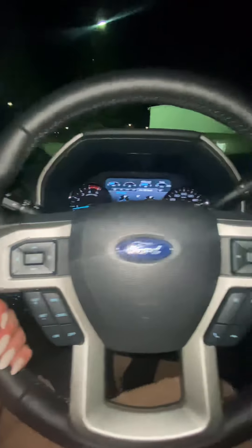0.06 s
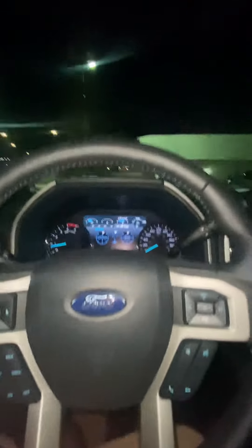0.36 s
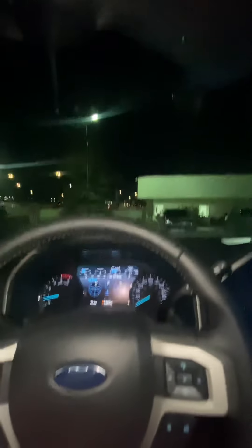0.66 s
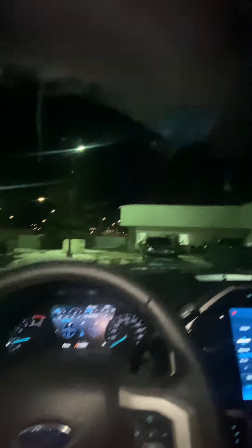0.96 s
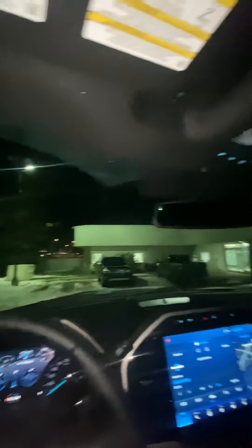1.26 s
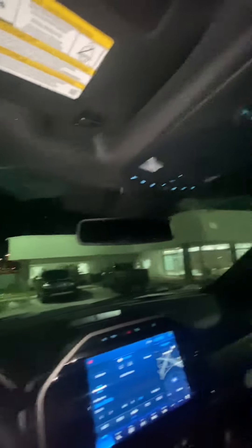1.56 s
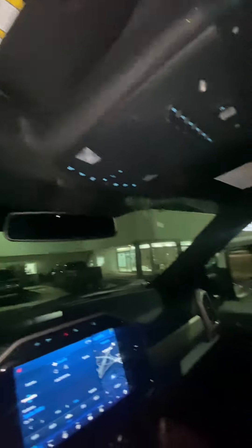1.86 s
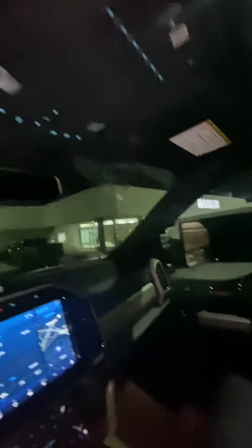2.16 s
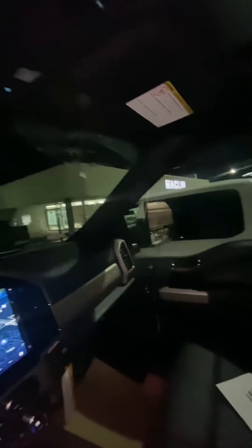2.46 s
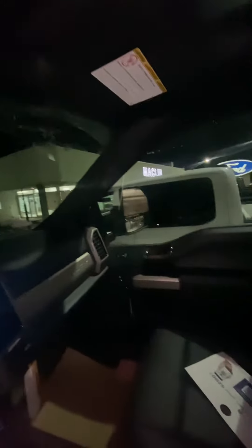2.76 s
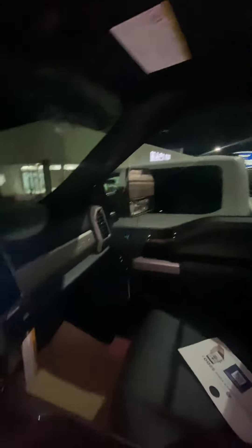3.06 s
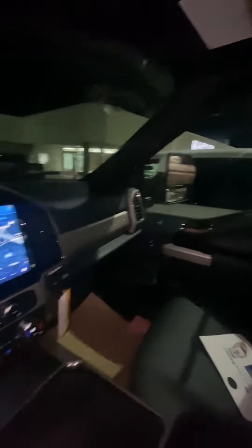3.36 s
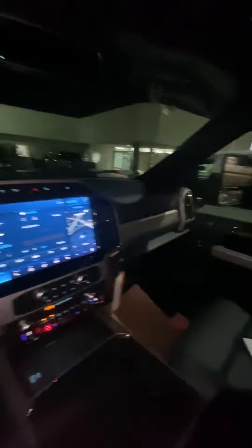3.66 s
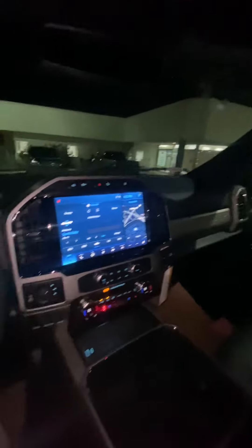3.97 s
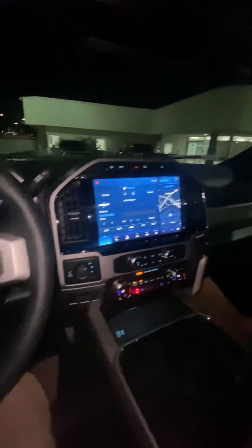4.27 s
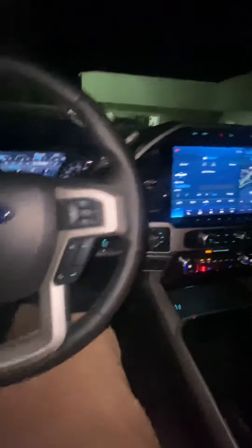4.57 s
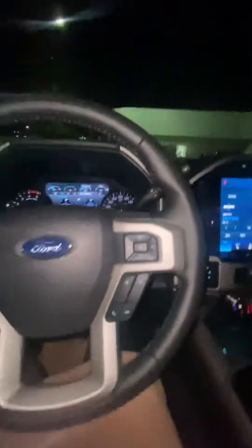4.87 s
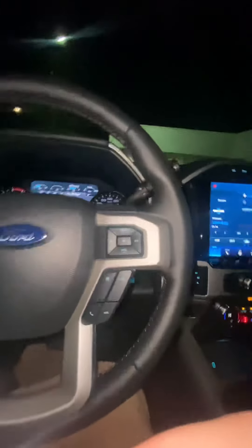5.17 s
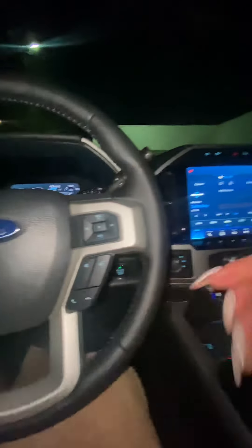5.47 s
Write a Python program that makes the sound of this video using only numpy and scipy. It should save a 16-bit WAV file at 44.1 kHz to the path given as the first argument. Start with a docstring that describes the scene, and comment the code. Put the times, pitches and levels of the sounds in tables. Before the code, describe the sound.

A diesel pickup idles with a low rumble inside the cab, vents blowing softly, until fingers tick and knock on the microphone.

```python
"""A diesel pickup idles, heard from the driver's seat with the cab shut.
Its firings give a low note, and uneven combustion shakes the cab into a lumpy rumble.
Dashboard vents blow, changing colour as the hand-held microphone turns toward the passenger
side and back. Near the end a sleeve swishes past, and fingers tick, slide and knock on the
microphone's case, which rings briefly."""
import sys
import numpy as np
from scipy import signal
from scipy.fft import rfft, irfft, next_fast_len
from scipy.io import wavfile
from scipy.ndimage import uniform_filter1d

SR = 44100
rng = np.random.default_rng(int(sys.argv[2]) if len(sys.argv) > 2 else 0)


def transcribe(signal):
    """Save signal, clipped to [-1, 1], as a 16-bit WAV file at the path in sys.argv[1]."""
    frames = np.atleast_2d(signal).T
    limited = np.clip(frames, -1, 1)
    pcm = np.round(limited * 32767).astype(np.int16)
    wavfile.write(sys.argv[1], SR, pcm)


N = 247911
TIME = np.arange(N) / SR
SIZE = next_fast_len(N, True)
BINS = np.fft.rfftfreq(SIZE, 1 / SR)


# firing rate of the eight cylinders: t/s, f/Hz
FIRING_RATE = [(0, 43.76), (1, 43.75), (1.6, 43.6), (5.62, 43.6)]
# the cab's response to the shaking engine: f/Hz, level/dB
CAB_EQ = [(12, -40.5), (26, -27.5), (34, -16.5), (48, -10), (58, 2), (68, 2), (80, 2), (100, -3),
          (113, 0.5), (123, -0.5), (131, 6), (146, 0.5), (185, -12.5), (240, -19.5), (400, -31.5)]
# fader ride on the body's deep shudder: t/s, level/dB
SHUDDER_RIDE = [(0, -38), (.24, -27), (.33, -38), (.5, -28.5), (.7, -37), (.85, -29.5), (.98, -37.5),
                (1.18, -29), (1.31, -36), (1.43, -28), (1.58, -34.5), (2, -33.5), (2.13, -37), (2.67, -32),
                (3, -37), (3.35, -34), (3.55, -39), (3.66, -31), (3.9, -40), (4.02, -32.5), (4.55, -36),
                (4.67, -28.5), (5.03, -38.5), (5.17, -28), (5.62, -37)]
# fader ride on the hum around the third harmonic: t/s, level/dB
HUM_RIDE = [(0, -53), (.12, -28.5), (.3, -32), (.4, -26.5), (.52, -37.5), (.65, -26), (.87, -29),
            (1.0, -38), (1.16, -38), (1.23, -31.5), (1.33, -39.5), (1.7, -37), (2, -41.5), (2.13, -32),
            (2.5, -35), (3, -37.5), (3.3, -35.5), (3.56, -48), (3.67, -29), (3.87, -33), (4.13, -39.5),
            (4.26, -32), (4.5, -35), (5.04, -30), (5.14, -41.5), (5.33, -36.5), (5.47, -34), (5.62, -36.5)]

def engine(shudder_top_hz=105, hum_band_hz=(114.2, 154.3), surge_db=1.4):
    """Firings give a clean low note; uneven combustion makes the cab shudder, hum and boom."""
    firings = np.cumsum(curve(FIRING_RATE)) / SR
    note = gain_of(2) * harmonic(firings, 1) + gain_of(-13) * harmonic(firings, 2)
    note *= turned(-34.5, -42)  # loudest by the wheel
    fan = cooling_fan()
    cab = gain_of(read(CAB_EQ, BINS))
    low, high = hum_band_hz
    shudder = steady_noise(cab * band(15, shudder_top_hz), span=4400) * gain_of(curve(SHUDDER_RIDE))
    clean_hum = gain_of(-3.5) * harmonic(firings, 3, waver_db=0.3, wander_cycles=0.026)
    rough_hum = gain_of(-3) * steady_noise(cab * band(low, high), span=4400)
    hum = (clean_hum + rough_hum) * gain_of(curve(HUM_RIDE))
    boom = steady_noise(cab * (band(shudder_top_hz, low) + band(high, 410)), span=4400)
    boom *= turned(-34.5, -36.5) * gain_of(surge_db * drift(5))
    return note + fan + shudder + hum + boom


def harmonic(firings, order, waver_db=0.9, wander_cycles=0.011):
    """One multiple of the firing rate; its wobble in level and timing scales with its order."""
    waver = gain_of(waver_db * order * drift(3.9))
    wander = wander_cycles * order * drift(4.54)
    return np.sqrt(2) * waver * np.cos(2 * np.pi * order * (firings + wander))


def cooling_fan(hz=59.5, db=-43.5):
    """The fan hums faintly at a pitch of its own, apart from the firing rate."""
    return np.sqrt(2) * gain_of(db) * np.sin(2 * np.pi * (hz * TIME + 0.24 * drift(0.88)))


# panel resonances: f/Hz, width/Hz, relative level/dB
PANEL_MODES = [(215.4, 38, -12), (333, 86, -11), (863, 115, -22.5)]

def panels():
    """The engine murmurs through the bulkhead's panels, most clearly in the driver's seat."""
    return resonances(PANEL_MODES) * turned(-32, -45)


# rush of the vents: f/Hz, level/dB
VENT_EQ = [(230, 3), (275, -3), (335, -7), (400, -2), (500, -3.5), (730, -8.5), (880, -13.5), (1020, -15.5),
           (1260, -18.5), (1520, -22.5), (1850, -24.5), (2450, -21.5), (3100, -27), (3700, -28.5),
           (4400, -32), (5100, -33), (5900, -36.5)]
# its faint top end: f/Hz, level/dB
VENT_TOP_EQ = [(6500, -40), (7500, -44), (8400, -44.5), (9400, -44.5), (10500, -50), (12300, -54),
               (12900, -72)]
# vents the microphone swings past: nearest t/s, half-length/s, stream gain/dB, slat gain/dB
VENT_PASSES = [(1.237, 1, 1.5, -4), (2.895, 0.66, 1, 3.5), (4.247, 0.12, -0.5, 7)]

def vents(slat_hz=5410, slat_width_hz=1350, flutter_db=0.6, eddy_db=0.52):
    """Air streams from the dashboard; its roar and rush grow as the microphone turns into it."""
    colour = gain_of(read(VENT_EQ + VENT_TOP_EQ, BINS))
    slat_colour = 1 / np.sqrt(1 + (2 * (BINS - slat_hz) / slat_width_hz) ** 6)
    stream = gain_of(sum(db * nearness(s, half) for s, half, db, _ in VENT_PASSES))
    slats = gain_of(sum(db * nearness(s, half) for s, half, _, db in VENT_PASSES))
    layers = [(colour * band(215, 450), turned(-50, -44.5)),  # roar
              (colour * band(450, 950), turned(-55.5, -46.5) * stream),  # rush
              (colour * band(950, 12600), turned(-54.5, -53) * stream),  # hiss
              (slat_colour, turned(-66.5, -69) * slats)]  # hollow hiss of the slats
    # the turn crossfades between two patterns of reflections
    heading = np.pi / 2 * curve(MIC_TURN)
    ahead, aside = reflections(), reflections()
    flutter = flutter_db * drift(28)  # shared by the whole stream
    out = 0
    for eq, level in layers:
        air = np.cos(heading) * steady_noise(eq * ahead) + np.sin(heading) * steady_noise(eq * aside)
        eddies = eddy_db * drift(11)
        out += air * level * gain_of(flutter + eddies)
    return out


def reflections(strength=0.07, count=8):
    """Glass and trim throw sound back within milliseconds, combing its spectrum."""
    delays_s = rng.uniform(0.002, 0.016, (count, 1))
    return abs(1 + strength * np.exp(-2j * np.pi * BINS * delays_s).sum(0))


def windscreen_notch(air, at_s=3.7, half_s=0.3, hz=4100, width_hz=960, depth=0.3):
    """Glancing off the windscreen, the hiss briefly loses part of one band."""
    lost = filtered(air, np.exp(-(2 * (BINS - hz) / width_hz) ** 2))
    return air - depth * np.exp(-((TIME - at_s) / half_s) ** 2) * lost


# fingertip hits: t/s, level/dB, treble tilt/(dB per octave)
KNOCK_HITS = [(4.838, -25.5, -7), (5.082, -18, -4), (5.144, -43, 0), (5.249, -30, -1), (5.3989, -13.5, 0),
              (5.4089, -3.5, -0.5)]
# the case's ring: f/Hz, relative level/dB, t60/s, right port's lead/rad
CASE_MODES = [(219, -24.5, 0.072, 1.2), (333, -18.5, 0.052, 1.3), (449, -14, 0.028, 1.3),
              (509, -1.5, 0.027, 3), (550, -17.5, .09, 2.27), (820, -19, 0.022, 3.5), (1047, -30, 0.1, 1.7),
              (1240, -17, 0.022, 3.07), (1420, -21, 0.03, 3.3), (1730, -29, 0.026, 2.5),
              (1946, -28.5, 0.031, 1.25)]

def knocks(rise_s=0.0019, tilt_above_hz=520):
    """A soft fingertip flexes the case, whose strongest modes push the ports nearly in opposition."""
    out = np.zeros((2, N))
    t = np.arange(-800, 3200) / SR
    for s, db, tilt in KNOCK_HITS:
        slot = out[:, round((s + t[0]) * SR):][:, :len(t)]
        for hz, mode_db, t60, lead in CASE_MODES:
            envelope = np.exp(np.minimum(t / rise_s, -np.log(1000) * t / t60))
            ring = envelope * np.sin(2 * np.pi * hz * t + np.array([[0], [lead]]))
            tilt_db = tilt * max(np.log2(hz / tilt_above_hz), 0)
            slot += gain_of(db + mode_db + tilt_db) * ring[:, :slot.shape[1]]
    return out


# nail hits: t/s, level/dB, tilt/(dB per octave), ring decay/s,
# low ring f/Hz, level/dB, high ring f/Hz, level/dB
NAIL_HITS = [(4.818, -24.5, -0.7, .0018, 1650, -31, 2400, -31),
             (5.0776, -27, 3, .0012, 2500, -32, 8300, -38),
             (5.0786, -31, -2.5, .002, 1360, -25.5, 3200, -40),
             (5.1385, -37, 0, .002, 1750, -38, 8350, -46), (5.232, -37, 1, .001, 3300, -47, 5600, -50),
             (5.2455, -34, -1, .002, 1100, -42, 1910, -45), (5.372, -42, -5, .003, 1150, -36, 2500, -48),
             (5.396, -29, -4, .0018, 1510, -32, 2600, -33),
             (5.4058, -29, -5.5, .0025, 1290, -31, 2510, -28.5),
             (5.4076, -18, -3.8, .0024, 1950, -28, 3550, -35)]
# snap of a nail on the case: f/Hz, level/dB
NAIL_EQ = [(500, 11), (1500, 1), (1950, -3), (2400, -8), (2900, -8), (3500, 1), (5000, -0.5), (6300, 2),
           (7200, -15.5), (9000, -17), (12000, -25), (15000, -47)]

def nail_ticks(grit_rise_s=0.0004, grit_decay_s=0.0008, snap=0.4, ring_rise_s=0.0006, lead_rad=2.5):
    """A nail touches the case: a millisecond of grit and a brief two-note ring of the spot it hits."""
    out = np.zeros((2, N))
    for s, db, tilt, decay_s, low_hz, low_db, high_hz, high_db in NAIL_HITS:
        t = TIME - s
        colour = gain_of(read(NAIL_EQ, BINS) + tilt * np.log2(BINS / 2500 + 0.085))
        grit = rng.standard_normal((2, N)) + rng.standard_normal(N)
        grit *= transient(t, grit_rise_s, grit_decay_s)
        grit /= np.linalg.norm(grit, axis=1, keepdims=True)
        grit[:, round(s * SR)] += snap
        out += gain_of(db) * filtered(grit, colour / colour.mean())
        for hz, ring_db in (low_hz, low_db), (high_hz, high_db):
            ring = np.sin(2 * np.pi * hz * t + np.array([[0], [lead_rad]]))
            out += gain_of(ring_db) * ring * transient(t, ring_rise_s, decay_s)
    return out


# finger strokes: peak t/s, level/dB, attack/s, release/s
SLIDE_STROKES = [(5.14, -33, 0.16, 0.25), (5.385, -38, 0.077, 0.06)]
# scrape of the finger: f/Hz, level/dB
SLIDE_EQ = [(90, 2), (200, 14.5), (420, 10.5), (660, 12), (900, 6.5), (1600, -4), (2300, -6), (3100, -7.5),
            (3700, -11.5), (5000, -13.5), (7200, -20.5), (8500, -30), (10500, -35), (13000, -44)]
# stereo image of the scrape: f/Hz, left-right likeness (-1 or below = opposed)
SLIDE_IMAGE = [(200, -0.48), (900, -1.19), (2000, -0.46), (5000, -0.24)]

def finger_slide():
    """A finger scrapes the case, moving the ports in opposition at low pitch."""
    return friction(SLIDE_EQ, read(SLIDE_IMAGE, BINS), grain_db=0, grit=0.34) * strokes(SLIDE_STROKES)


# squeaks in the slide: peak t/s, level/dB, attack/s, release/s, f/Hz, glide/(Hz per s), width/Hz
SKIN_SQUEAKS = [(5.125, -60, 0.075, 0.06, 8600, 0, 1500), (5.162, -60, .025, .03, 9000, -6000, 1700),
                (5.141, -50, 0.06, 0.045, 1850, -9000, 800), (5.133, -55.5, .06, .06, 3850, -4000, 900)]

def squeaks(spurt_db=3):
    """Sliding skin sticks and slips in short spurts at a few fuzzy pitches, most of them falling."""
    out = 0
    for s, db, attack, release, hz, glide, width in SKIN_SQUEAKS:
        pitch = hz + glide * np.clip(TIME - s, -attack, release)
        out += noise_band(pitch, width, likeness=-0.1) * strokes([(s, db, attack, release)])
    return out * unit_rms(gain_of(spurt_db * drift(180)))


# sleeve stroke: peak t/s, level/dB, attack/s, release/s
SLEEVE_STROKE = [(4.37, -60.5, 0.5, 0.25)]
# hiss of the cloth: f/Hz, level/dB
SLEEVE_EQ = [(3000, -28), (5000, 3), (7000, -4.5), (9800, -5), (12000, -6), (13000, -16), (15500, -24)]

def sleeve_swish():
    """A sleeve brushes past with a soft, bright hiss."""
    return friction(SLEEVE_EQ, likeness=0.28, grain_db=-2, grit=0.1) * strokes(SLEEVE_STROKE)


def friction(eq, likeness, grain_db, grit, pressure_db=2, catches_per_s=420):
    """Rubbing hiss that catches and slips in millisecond grains, under an uneven pressure."""
    hiss = port_noise(np.ones(len(BINS)), likeness)
    catches = rng.random(N) < catches_per_s / SR
    strength = gain_of(0.5 * np.minimum(rng.exponential(1, N), 3))
    crackle = unit_rms(signal.lfilter([1], [1, -np.exp(-1000 / SR)], catches * strength))
    grains = hiss * (1 - grit + grit * crackle)
    scrape = unit_rms(filtered(grains, gain_of(read(eq, BINS))))
    return scrape * unit_rms(gain_of(grain_db * drift(250) + pressure_db * drift(31)))


# the hollow between dashboard and windscreen: f/Hz, width/Hz, level/dB
HOLLOW_MODES = [(729, 133, -51.5), (1290, 76, -59)]

def windscreen_hollow():
    """Air rings in the hollow under the windscreen, heard as the microphone sweeps past it."""
    return resonances(HOLLOW_MODES) * nearness(at_s=1.35, half_s=0.68)


# moving peak in the vents' hiss: t/s, f/Hz, level/dB
HISS_PEAK = [(0, 3710, -79), (.8, 3400, -67), (1.3, 3100, -67.5), (1.9, 2900, -79), (2.4, 3900, -70),
             (2.9, 4490, -68), (3.3, 5200, -68), (3.9, 5500, -79), (4.7, 5500, -78)]

def hiss_sweep():
    """A broad peak in the hiss dips in pitch, then climbs, as the microphone crosses the dashboard."""
    s, hz, db = np.transpose(HISS_PEAK)
    hiss = noise_band(np.interp(TIME, s, hz), width_hz=1100, likeness=0.98)
    return hiss * gain_of(np.interp(TIME, s, db))


# swell of the whistle: peak t/s, level/dB, attack/s, release/s
WHISTLE_SWELL = [(3.03, -70.5, 0.38, 0.27)]

def slat_whistle(hz=6060):
    """One slat whistles faintly while the microphone points at the passenger side."""
    return noise_band(np.full(N, hz), width_hz=120, likeness=0.65) * strokes(WHISTLE_SWELL)


# where the microphone points: t/s, heading (0 = wheel, 1 = passenger side)
MIC_TURN = [(0, 0), (.7, 0.35), (1.4, 0.6), (2.2, 0.88), (2.9, 1), (3.5, 0.79), (4.2, 0.75), (4.7, 0.22),
            (5.62, 0.31)]

def turned(wheel_db, passenger_db):
    """Gain that rides between two levels as the microphone turns."""
    return gain_of(wheel_db + (passenger_db - wheel_db) * curve(MIC_TURN))


# stereo image of the steady noise, with left and right opposed around 7-8 kHz:
# f/Hz, likeness 0-1, left lead/rad, left gain/dB
NOISE_IMAGE = [(60.3, 0.98, 0, 1), (129, 1, 0.12, -2), (280, 0.94, 0.36, -3), (530, 0.94, 1.12, -2),
               (784, 0.36, 0.92, 0), (1230, 0.14, 0.76, 4), (2010, 0.59, 0.74, 0), (2360, 1, 1.91, -0.5),
               (4200, 0.75, 1.56, 1), (5500, 0.8, 1, -1), (6550, 0.4, 2, -1.5), (6920, 1, 3.5, 3.5),
               (7830, 1, 3, 2), (8600, 0.8, 1.5, 3), (9500, 1, 0, -3), (10900, 0.6, 0.5, 4)]

def steady_noise(eq, span=9000):
    """Coloured stereo noise, its level held even over span samples."""
    likeness, lead_rad, left_db = (read(NOISE_IMAGE, BINS, column) for column in (1, 2, 3))
    pair = port_noise(eq, likeness, lead_rad, left_db)
    power = uniform_filter1d(uniform_filter1d(pair.mean(0) ** 2, span), span)
    return pair / np.sqrt(power + 1e-12)


def port_noise(eq, likeness, lead_rad=0, left_db=0):
    """Coloured noise, left and right partly alike; their mean has unit rms."""
    shared, separate = rfft(rng.standard_normal((2, SIZE)))
    likeness = np.clip(likeness, -0.999, 0.999)
    left = shared * np.exp(1j * lead_rad) * gain_of(left_db)
    right = likeness * shared + np.sqrt(1 - likeness ** 2) * separate
    pair = irfft(np.array([left, right]) * eq, SIZE)[:, :N]
    return pair / pair.mean(0).std()


def resonances(modes):
    """Steady noise ringing in a few resonant peaks."""
    return sum(gain_of(db) * steady_noise(1 / (1 + (2 * (BINS - hz) / width) ** 2))
               for hz, width, db in modes)


def noise_band(hz, width_hz, likeness):
    """A band of noise whose centre follows the curve hz."""
    fuzz = signal.hilbert(port_noise(np.exp(-(BINS / width_hz) ** 2), likeness), SIZE)[:, :N]
    return (fuzz * np.exp(2j * np.pi * np.cumsum(hz - width_hz / 2) / SR)).real


def strokes(rows):
    """Envelope in which each stroke swells to its peak, then lets go."""
    return sum(gain_of(db) * np.interp(TIME, [s - attack, s, s + release], [0, 1, 0]) ** 2
               for s, db, attack, release in rows)


def transient(t, rise_s, decay_s):
    """Exponential attack and decay, peaking at t = 0."""
    return np.exp(-np.maximum(-t / rise_s, t / decay_s))


def nearness(at_s, half_s):
    """Pass-by envelope: 1 when nearest, a half at half_s to either side."""
    return 1 / (1 + ((TIME - at_s) / half_s) ** 2)


def drift(hz, size=8192):
    """Random modulation of unit rms, up to about hz."""
    rate = np.fft.rfftfreq(size, TIME[-1] / size)
    slow = irfft(rfft(rng.standard_normal(size)) * np.exp(-(rate / hz) ** 2), size)
    return unit_rms(np.interp(TIME, np.linspace(0, TIME[-1], size), slow))


def band(low_hz, high_hz):
    """Gain of a steep band-pass; neighbouring bands add up to even power."""
    return 1 / np.sqrt((1 + (low_hz / (BINS + 1)) ** 20) * (1 + (BINS / high_hz) ** 20))


def filtered(x, eq):
    """Applies one gain per frequency bin."""
    return irfft(rfft(x, SIZE) * eq, SIZE)[:, :N]


def read(points, hz, column=1):
    """Reads one column of a spectrum on a log-frequency axis."""
    points = np.array(points)
    return np.interp(np.log(hz + 1), np.log(points[:, 0] + 1), points[:, column])


def curve(rows):
    """An automation curve at every sample."""
    return np.interp(TIME, *np.transpose(rows))


def gain_of(db):
    """Decibels to amplitude."""
    return 10 ** (np.asarray(db) / 20)


def unit_rms(x):
    """Scales to unit rms."""
    return x / np.sqrt(np.mean(x ** 2) + 1e-20)


def scene():
    """The engine over a bed of vent air and panel murmur, with handling noise on top."""
    rubbing = sleeve_swish() + finger_slide()
    idle = engine()
    bed = windscreen_notch(vents()) + panels() + windscreen_hollow() + hiss_sweep() + slat_whistle()
    duck = gain_of(-12 * np.exp(-((TIME - 5.145) / 0.042) ** 2))  # the sliding finger covers the ports
    return idle + bed * duck + rubbing + squeaks() + nail_ticks() + knocks()


def record(dry, cutoff_hz=15100):
    """A steep low-pass trims the top end."""
    low_pass = signal.firwin(511, cutoff_hz, window=("kaiser", 9), fs=SR)
    return signal.oaconvolve(dry, low_pass[None], "same")


dry = scene()
out = record(dry)
transcribe(out)
```